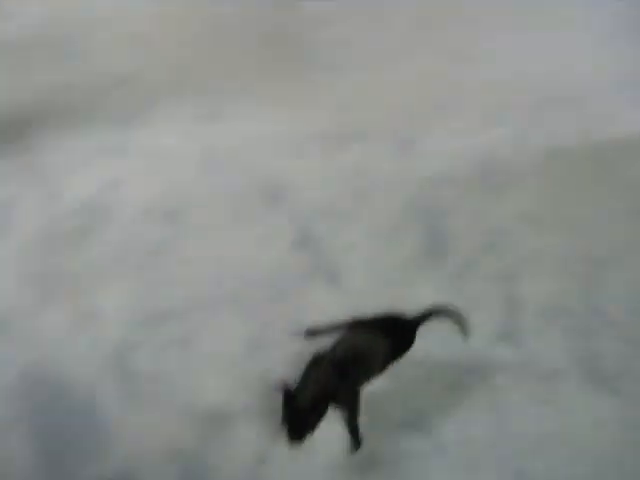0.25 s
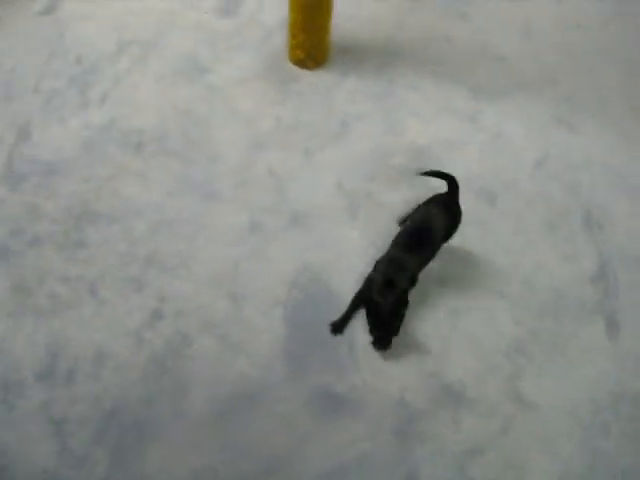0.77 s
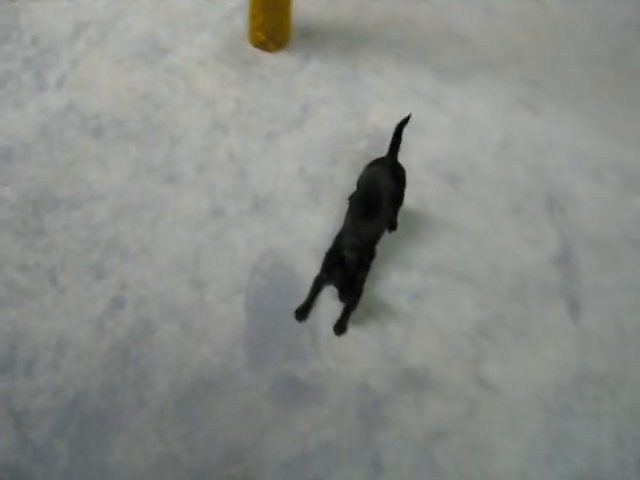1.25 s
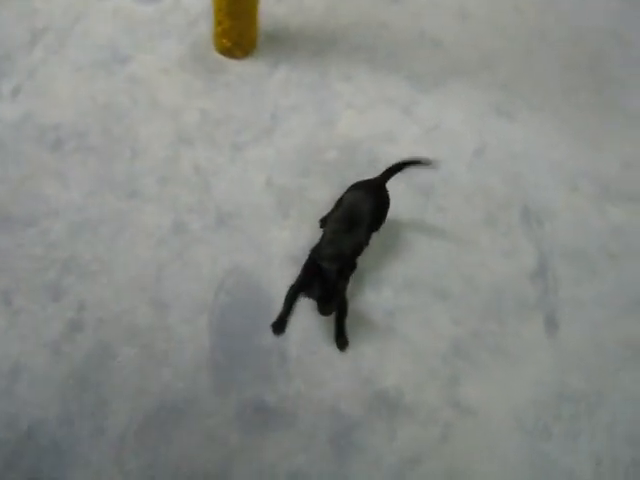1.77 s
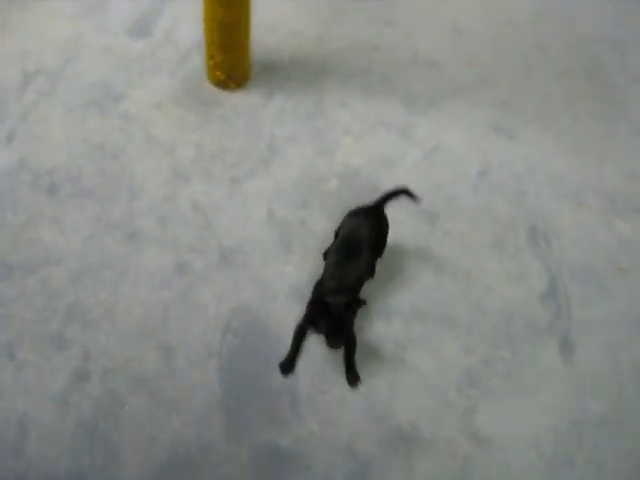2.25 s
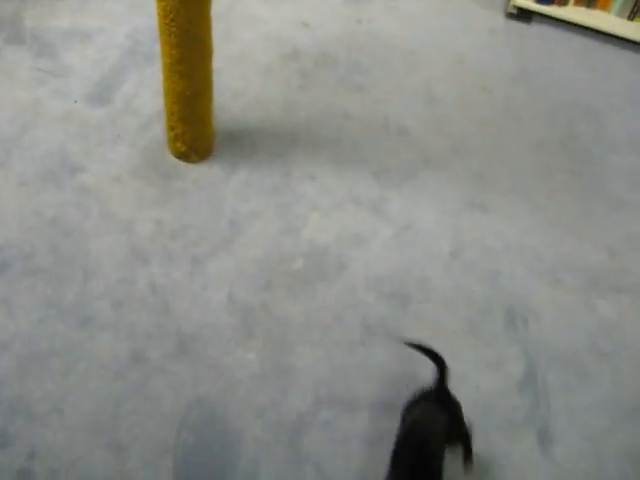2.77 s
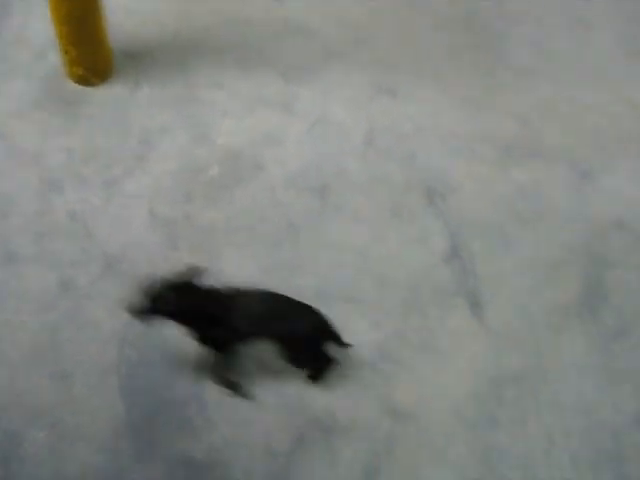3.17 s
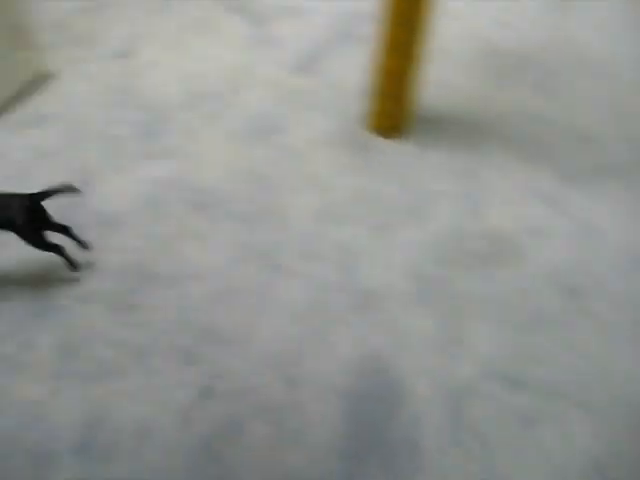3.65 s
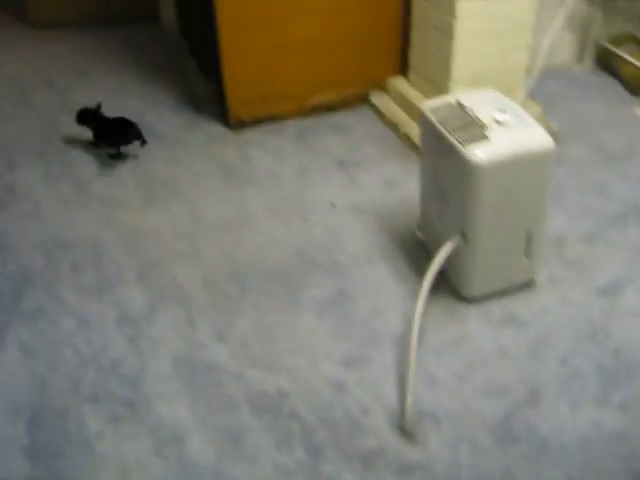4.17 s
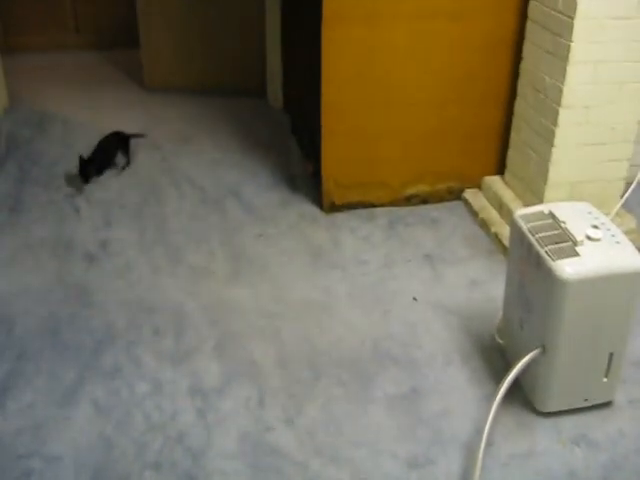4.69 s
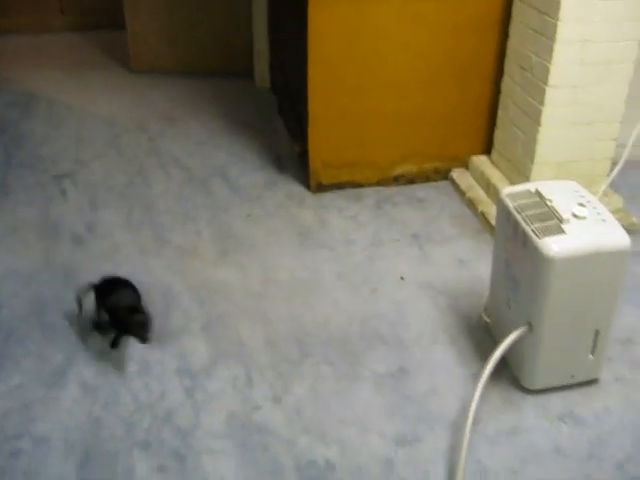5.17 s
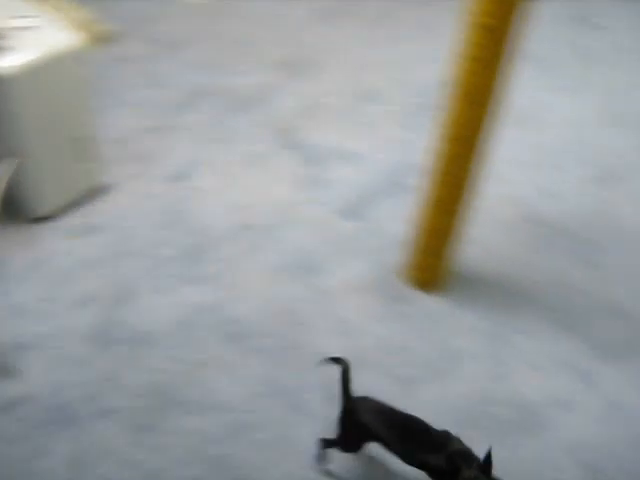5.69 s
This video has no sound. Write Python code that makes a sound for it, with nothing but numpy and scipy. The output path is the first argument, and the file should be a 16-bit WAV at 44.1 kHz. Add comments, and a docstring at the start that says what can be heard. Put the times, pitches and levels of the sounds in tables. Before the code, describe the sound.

A small puppy scampers on a hard basement floor, growling in raspy playful bursts and yipping once sharply, over steady hiss in an echoing room.

```python
"""In the bare room of a basement, a small puppy growls in play on the hard floor and once breaks into a yip.
Growls are rough voice pulses and puffs of air ringing a throat and mouth; the yip is a clean stack of
harmonics that flips up into a whistle voice. Paws land with thuds and claw ticks, and scuffs are swells
of grainy noise. The room adds reflections and a tail over which a steady hiss lies; a small camera with
gain control, a notch in the treble and an upper limit picks it all up."""
import sys
import numpy as np
from scipy import signal
from scipy.fft import rfft, irfft, next_fast_len
from scipy.io import wavfile
from scipy.ndimage import uniform_filter1d

SR = 44100
rng = np.random.default_rng(int(sys.argv[2]) if len(sys.argv) > 2 else 0)


def waveform_to_disk(signal):
    """Save audio, clipped to [-1, 1], as 16-bit WAV at the path in sys.argv[1]."""
    frames = np.transpose(np.atleast_2d(signal))
    scaled = np.clip(frames, -1, 1) * 32767
    samples = np.round(scaled).astype(np.int16)
    wavfile.write(sys.argv[1], SR, samples)


N = 261556
TIME = np.arange(N) / SR
SIZE = next_fast_len(N, real=True)
HZ = np.fft.rfftfreq(SIZE, 1 / SR)


def growl(flutter_hz=100, puff_turns=0.51, low_db=-2.5, mid_db=-3.0, rasp_db=-3,
          upper_width=650, side_db=-5, treble_db=-34):
    """Uneven snaps of the vocal folds, each with a puff of air, ring the throat and mouth."""
    # low resonances of the throat at a pitch of 300 Hz:
    # (frequency [Hz], width of each smoothing pass [Hz], level before the overall levelling [dB])
    throat_table = [(290, 470, -0.5), (795, 232, 4)]
    jitter, shimmer, air, mouth_width = 0.15, 0.5, 1, 620  # width in Hz
    sounding, effort, mouth, rasp, hz, rough, mouth_hz, upper_hz = pushes()

    # the rougher the voice, the more its pitch jitters
    turns = np.cumsum(hz * (1 + jitter * rough ** 2 * wander(150))) / SR
    folds = unit(sum(np.cos(2 * np.pi * k * turns) for k in np.arange(1, 24)))
    # each puff starts with a snap and dies away over a share of a turn
    puffs = unit(np.exp(-(turns % 1) / puff_turns) * rng.standard_normal(N))

    # loose tissue flaps more slowly than the folds and makes the pulses strong and weak
    flap = np.cos(2 * np.pi * np.cumsum(flutter_hz * (1 + 0.1 * wander(30))) / SR)
    unevenness = np.exp(shimmer * rough * (flap + 0.86 * wander(72)))
    drive = (folds + air * rough ** 2 * puffs) * unevenness

    # the larynx rises with the pitch and lifts the low resonances; the jaw trembles
    lift = (hz / 300) ** 0.3
    mouth_hz = mouth_hz * (1 + 0.05 * wander(20))

    # neighbouring resonances ring in opposite phase, which fills the valley between them
    low = np.zeros(N)
    for k, (f, width, db) in enumerate(throat_table):
        low += (-1) ** k * amp(db) * resonate(drive, f * lift, width)
    side = resonate(drive, 1.28 * mouth_hz, mouth_width)
    mid = resonate(drive, mouth_hz, mouth_width) - amp(side_db) * side
    top = resonate(drive, upper_hz, upper_width) + amp(-6.0) * drive

    # the last part is a faint treble noise that rises and falls with the mouth level
    parts = [(band(low, 217, 1860), low_db),
             (band(mid, 380, 2050), mouth + mid_db),
             (band(top, 1030, 4130), rasp + rasp_db),
             (band(puffs, 9300, 13000), mouth + treble_db)]
    return sounding * sum(amp(effort + db) * steady(part, size=600) for part, db in parts)


def pushes():
    """Growl controls at every sample: they follow the slack, 0 at the peak of a push and 1 at its ends."""
    # growls, each row one push that swells and slackens; pushes that touch run on as one long growl:
    # (start [s], swell [s], fade [s], slackening [dB], then at the peak and before the trims in growl():
    #  effort [dB], mouth over throat [dB], rasp over throat [dB], pitch [Hz], roughness [0-1],
    #  mouth resonance [Hz], upper resonance [Hz])
    push_table = np.array([(2.83, 0.0088, 0.049, 2.5, -31.5, 1.5, 0, 310, 0.92, 1630, 4210),
                           (2.888, 0.0085, 0.097, 8, -29.5, 1, -19, 295, 1, 1550, 3930),
                           (2.993, .04, 0.058, 4, -27.5, 6.5, -11.5, 391.5, .67, 1580, 3960),
                           (3.088, 0.038, 0.0079, 7.5, -26.5, 18.5, 4.5, 544.7, 0.63, 1370, 3920),
                           (4.205, 0.015, 0.049, 6, -25, 2.5, -11, 408.1, 0.87, 1660, 4065),
                           (4.275, 0.0088, 0.082, 6, -32.5, -4.5, -26, 302.4, 0.93, 1500, 3700),
                           (4.365, 0.058, 0.075, 6.5, -27, -6, -22.5, 339.4, 0.85, 1524, 3300),
                           (4.5, 0.0573, 0.078, 1.5, -34.5, -5.5, -16, 290, .8, 1540, 3100),
                           (4.934, 0.014, 0.054, 5.5, -39, 3, 2, 320.4, 0.82, 2300, 4500),
                           (5.15, 0.063, .022, 13, -31.5, 14, 4.5, 378.6, 0.79, 1707, 4197),
                           (5.246, .022, 0.051, 11.5, -31.5, 10.5, 2, 379, .78, 1560, 3126),
                           (5.332, 0.015, 0.027, 2, -37, 6, -4, 309.1, 0.89, 1442, 3360),
                           (5.374, .012, 0.072, 8, -27, 8, -6, 416.7, 0.85, 1310, 3600),
                           (5.624, .012, .04, 10.5, -29, 3.5, 1, 350.3, 0.84, 1505, 3754),
                           (5.779, 0.015, 0.1, 10.5, -21.5, 0, -8, 429, 0.74, 1620, 3923)])
    rest_hz, pitch_sag = 279.3, 0.8  # resting pitch, and share of the way down to it
    jaw_drop, tongue_drop = 0.13, 0.084  # shares by which the mouth and upper resonances sink
    closing, smoothing = 0.71, 0.84  # dB that mouth and rasp lose, over the throat, per dB of slackening
    glide_s = 0.005  # time the throat takes to start, stop or change

    row = np.maximum(np.searchsorted(push_table[:, 0], TIME, "right") - 1, 0)
    start, swell, fade, depth, effort, mouth, rasp, top_hz, rough, mouth_hz, upper_hz = push_table[row].T
    past_peak = TIME - start - swell
    slack = np.minimum(np.maximum(-past_peak / swell, past_peak / fade), 1)
    sounding = slack < 1
    loss = depth * slack
    hz = top_hz + (rest_hz - top_hz) * pitch_sag * slack
    controls = [sounding, effort - loss, mouth - closing * loss, rasp - smoothing * loss,
                hz, np.clip(rough, 0, 1),
                mouth_hz * (1 - jaw_drop * slack), upper_hz * (1 - tongue_drop * slack)]
    return uniform_filter1d(np.array(controls), round(glide_s * SR))


def yip(closing_hz=3500):
    """The voice squeals, breaks upward, and loses its fundamental and its treble as the mouth closes."""
    # the squeal: (time [s], pitch [Hz], level before the room [dB])
    squeal_curve = [(3.122, 554, -55), (3.131, 592.4, -14.5), (3.139, 621, -23), (3.147, 616.8, -15),
                    (3.171, 663, -18.5), (3.185, 606, -24.5)]
    # the whistle voice it flips into: (time [s], pitch [Hz], level before closing and room [dB])
    whistle_curve = [(3.181, 1199, -39), (3.188, 1026, -18), (3.198, 1067, -20), (3.209, 1179, -19.5),
                     (3.221, 1072, -29), (3.231, 1121, -23.5), (3.252, 1104, -31), (3.29, 1174, -31.5)]
    thinning_db = np.interp(TIME, [3.22, 3.24], [3, -8])
    squeal = cry(squeal_curve, jitter=0.012, breathy_db=-15)
    whistle = cry(whistle_curve, jitter=0.014, breathy_db=-18, fundamental_db=thinning_db)
    closed = np.clip((TIME - 3.205) / 0.017, 0, 1)  # 0 open, 1 closed
    return squeal + (1 - closed) * whistle + closed * band(whistle, 480, closing_hz)


def cry(rows, jitter, breathy_db, fundamental_db=0):
    """A clean stack of harmonics sliding under the resonances of the open throat, with a little air."""
    # wide-open throat: (frequency [Hz], relative level [dB])
    open_throat = [(600, -52), (1070, 3), (1240, -4), (1900, 1), (2350, 3.5), (3000, -7), (3850, 1.5),
                   (4400, 3), (5000, -19), (6200, -13), (7400, -37), (10000, -37), (13000, -22)]
    hz, level = follow(rows)
    turns = np.cumsum(hz * (1 + jitter * wander(270))) / SR
    on = gate(rows)
    live = on > 1e-6  # compute the harmonics only where they sound
    k = np.arange(1, 13)[:, None]  # harmonic numbers
    first_db = (k == 1) * (fundamental_db * np.ones(N))[live]
    heights = amp(read(open_throat, k * hz[live]) + first_db)
    lag = rng.random(k.shape)  # the throat delays each harmonic by its own share of a turn
    harmonics = heights * np.sin(2 * np.pi * (k * turns[live] + lag))
    voice = np.zeros(N)
    voice[live] = harmonics.sum(0) / np.sqrt((heights ** 2).sum(0) / 2)
    breath = amp(breathy_db) * noise(open_throat)
    return on * amp(level + 1.3 * wander(140)) * (voice + breath)


def paws(claw_s=0.01, thud_db=3, claw_db=2, rise_s=0.0015, claw_rise_s=0.0018):
    """Each paw lands with a soft, quickly dying thud and a tick of claws."""
    # paw falls, before the trims thud_db and claw_db: (time [s], level [dB], claw click over thud [dB])
    paw_falls = [(0.154, -45.5, -2), (0.18, -50, 2), (0.426, -48.5, 7.5), (0.454, -54.5, 16),
                 (0.685, -53, 13.5), (2.561, -58, 18.5), (2.78, -49, 6), (2.993, -57, 20),
                 (3.303, -44.5, 6), (3.347, -48, 21.5), (3.387, -45, -9), (3.43, -42, 2), (3.503, -45, 3.5),
                 (3.716, -45, 5), (3.816, -39.5, -19), (3.945, -37, -5), (4.042, -44, 0.5),
                 (4.186, -39, -5), (5.13, -38, -5), (5.18, -30.5, -8), (5.553, -33, -7.5),
                 (5.752, -40.5, -3), (5.894, -45, -31)]
    # what a paw rings on the floor, before each fall detunes it a little:
    # (frequency [Hz], relative level [dB], time to fall by 60 dB [s])
    thud_rings = [(193, 3, 0.047), (250.3, -3.5, 0.075), (431, 0, 0.045)]
    # colour of the claw noise: (frequency [Hz], relative level [dB])
    claw_colour = [(200, -5), (700, 10), (3000, 0.5), (5500, 0.5), (9000, -28), (15000, -5)]
    thud, claw = np.zeros((2, N))
    t = TIME[:SR // 5]
    soft = 1 - np.exp(-t / rise_s)
    tick = (1 - np.exp(-t / claw_rise_s)) * np.exp(-t / claw_s)
    for s, db, click_db in paw_falls:
        ring = np.zeros(len(t))
        for hz, level, t60 in thud_rings:
            detune = 1 + 0.06 * rng.standard_normal()
            ring += amp(level - 60 * t / t60) * np.sin(2 * np.pi * hz * detune * t)
        add(thud, s, amp(db) * soft * ring)
        add(claw, s, amp(db + click_db) * tick)
    return amp(thud_db) * band(thud, 137, 630) + amp(claw_db) * claw * noise(claw_colour)


def scuffs(grain_db=3.0, shape=1.8):
    """Brief grainy rubbing: dull and bright noise that swells and fades while its level flickers."""
    # scuffs and swishes, levels before the grain:
    # (time of the peak [s], half length [s], dull part [dB], bright part [dB])
    strokes = [(0.195, 0.058, -59, -42.5), (0.507, 0.053, -50, -57.5), (0.695, 0.068, -49, -51),
               (1.564, 0.1, -49, -80), (2.39, 0.09, -47, -51.5), (2.63, 0.076, -57, -57),
               (3.332, 0.01, -39.5, -50), (3.485, 0.0089, -40.5, -53), (3.769, 0.05, -43.5, -43),
               (4.973, .024, -36.5, -48), (5.195, 0.018, -35, -66), (5.602, 0.026, -44, -53),
               (5.925, .025, -65, -46)]
    # colours of the two parts: (frequency [Hz], relative level [dB])
    dull_colour = [(100, -15.5), (400, 1.5), (950, -2.5), (3000, 0), (9000, -14)]
    bright_colour = [(500, -35), (2000, -2), (5800, 10.5), (9500, -2), (14500, 3.5)]
    dull, bright = np.zeros((2, N))
    for s, half_length, dull_db, bright_db in strokes:
        stroke = np.exp(-abs((TIME - s) / half_length) ** shape)
        dull += amp(dull_db) * stroke
        bright += amp(bright_db) * stroke
    rubbing = dull * noise(dull_colour) + bright * noise(bright_colour)
    return rubbing * amp(grain_db * wander(183))


def hiss(level_db=-54):
    """Steady background noise of one colour and one level."""
    # colour: (frequency [Hz], relative level [dB])
    hiss_colour = [(15, -52), (25, -11), (240, -8), (322, -10.5), (359, -5), (410, -10.5), (1050, -9.5),
                   (1140, -10.5), (15500, -25)]
    return amp(level_db) * noise(hiss_colour)


def room(x, wet_db, early_db, early_s=0.013):
    """A quick cluster of floor and wall reflections, then a tail in which each band dies at its own speed."""
    # how long the tail rings: (frequency [Hz], time to fall by 60 dB [s])
    ring_times = [(150, 1), (500, 0.48), (1200, 0.36), (2500, 0.58), (4500, 0.57), (12000, 0.31)]
    t = TIME[:SR]
    # about 3000 reflections a second, each with a random sign
    taps = rng.choice([-1., 1.], SR) * (rng.random(SR) < 3000 / SR) * (t > 0.002)
    hz, age, z = signal.stft(taps, SR, nperseg=256)
    decay = amp(-60 * age / read(ring_times, hz)[:, None])
    tail = signal.istft(z * decay, SR, nperseg=256)[1][:SR]
    early = rng.permutation(taps) * np.exp(-t / early_s) * (t > 0.001)
    echo = amp(wet_db) * tail / np.linalg.norm(tail) + amp(early_db) * early / np.linalg.norm(early)
    return x + signal.fftconvolve(x, echo)[:N]


def amp(db):
    """Decibels to gain."""
    return 10 ** (np.asarray(db) / 20)


def unit(x):
    """Scales to rms 1."""
    return x / np.sqrt(np.mean(x ** 2) + 1e-20)


def steady(x, size):
    """Scales to a running rms of 1, leaving the single pulses as they are; size is in samples."""
    power = uniform_filter1d(uniform_filter1d(x ** 2, size), size)
    return x / np.sqrt(abs(power) + 1e-12)


def read(points, hz):
    """Reads a spectrum on a log-frequency axis."""
    f, value = np.transpose(points)
    return np.interp(np.log(hz + 1), np.log(f + 1), value)


def follow(rows):
    """The columns of a curve table at every sample."""
    s, *columns = np.transpose(rows)
    return [np.interp(TIME, s, c) for c in columns]


def noise(spectrum):
    """Noise of rms 1 with the given colour."""
    return unit(irfft(rfft(rng.standard_normal(SIZE)) * amp(read(spectrum, HZ)), SIZE)[:N])


def wander(rate_hz):
    """Random drift of rms 1, mostly slower than the given rate."""
    return unit(irfft(rfft(rng.standard_normal(SIZE)) / (1 + (HZ / rate_hz) ** 4), SIZE)[:N])


def gate(rows, gap=0.08):
    """1 while a call sounds, 0 before, after and in pauses of at least gap seconds, with soft edges."""
    s = np.transpose(rows)[0]
    sounding = np.r_[False, np.diff(s) < gap, False][np.searchsorted(s, TIME)]
    return uniform_filter1d(sounding * 1., size=100)


def resonate(x, hz, width):
    """A steep resonance that follows the curve hz: shift down to zero, smooth twice, shift back."""
    turn = np.exp(2j * np.pi * np.cumsum(hz * np.ones(N)) / SR)
    r = np.exp(-np.pi * width / SR)
    smooth = signal.lfilter([(1 - r) ** 2], [1, -2 * r, r * r], x / turn)
    return 2 * (turn * smooth).real


def band(x, lo_hz, hi_hz):
    """Steep band-pass."""
    return signal.sosfilt(signal.butter(3, [lo_hz, hi_hz], "band", fs=SR, output="sos"), x)


def add(mix, s, sound):
    """Adds a sound into the mix at time s."""
    part = mix[round(s * SR):][:len(sound)]
    part += sound[:len(part)]


def scene():
    """The puppy in its room over a hiss; it yips right below the camera, so with weaker early reflections."""
    growls = room(growl(), wet_db=-12.5, early_db=-7)
    yelp = room(yip(), wet_db=-12, early_db=-9)
    feet = room(paws() + scuffs(), wet_db=-7, early_db=-9.5)
    return (growls + yelp + feet + hiss())[None]


def record(dry, threshold_db=-22, squeeze=0.06, recovery_db=35,
           notch_hz=7950, notch_width_hz=750, edge_hz=15900):
    """Gain control gently turns down loud sounds; then come the camera's notch and its upper band limit."""
    power_db = 10 * np.log10(abs(uniform_filter1d(dry[0] ** 2, size=400)) + 1e-12)
    # the held level jumps up at once and sinks by recovery_db per second
    fall = TIME * recovery_db
    held_db = np.maximum.accumulate(power_db + fall) - fall
    over_db = np.maximum(held_db - threshold_db, 0)
    # the gain follows smoothly, over about 400 samples
    ducked = dry * amp(-squeeze * signal.lfilter([1 / 400], [1, 1 / 400 - 1], over_db))
    b, a = signal.iirnotch(notch_hz, notch_hz / notch_width_hz, SR)
    notched = signal.lfilter(b, a, signal.lfilter(b, a, ducked))  # two passes deepen and widen it
    low_pass = signal.firwin(511, edge_hz, window=("kaiser", 9), fs=SR)
    return signal.oaconvolve(notched, low_pass[None], "same")


dry = scene()
out = record(dry)
waveform_to_disk(out)
```